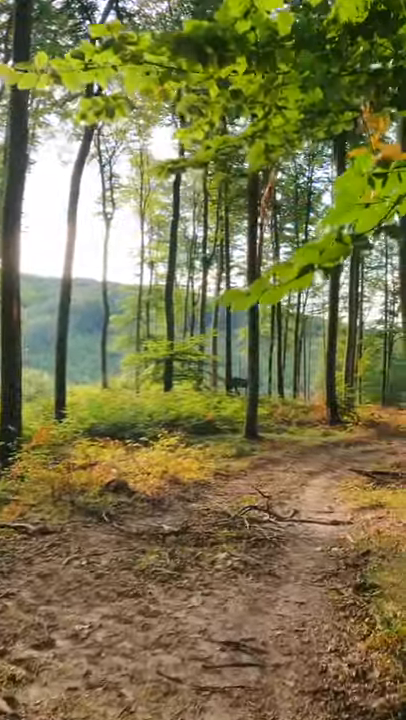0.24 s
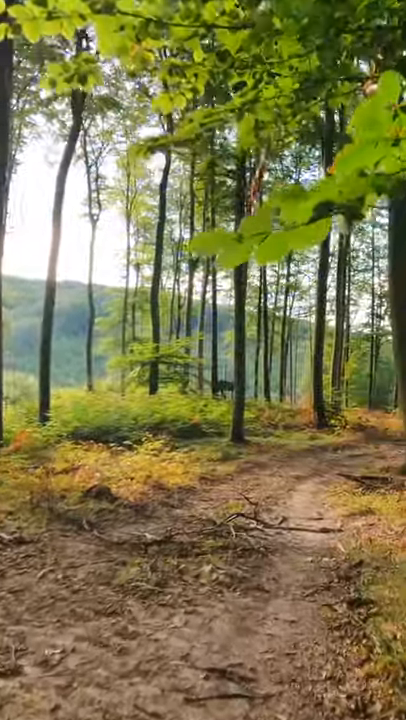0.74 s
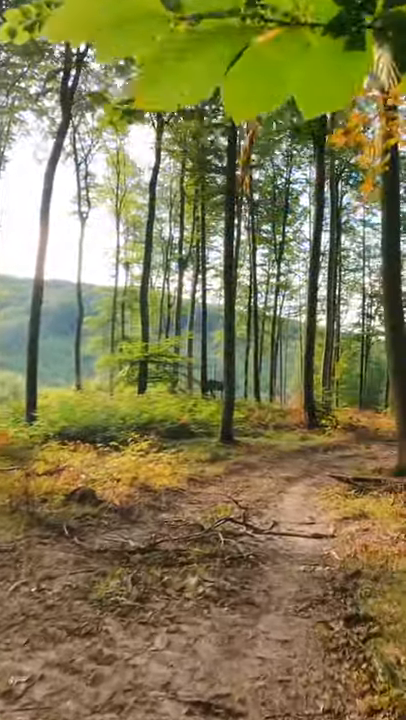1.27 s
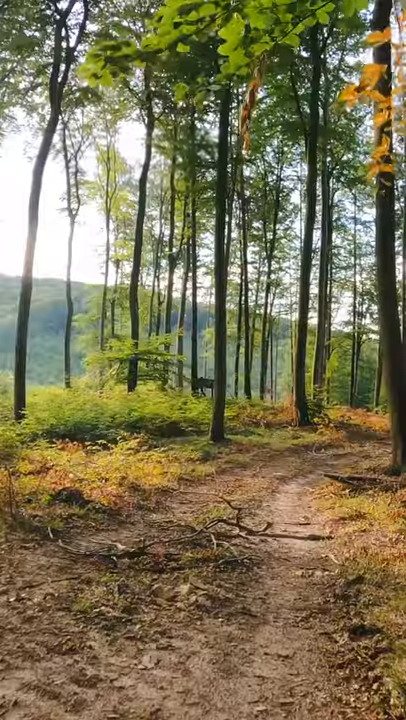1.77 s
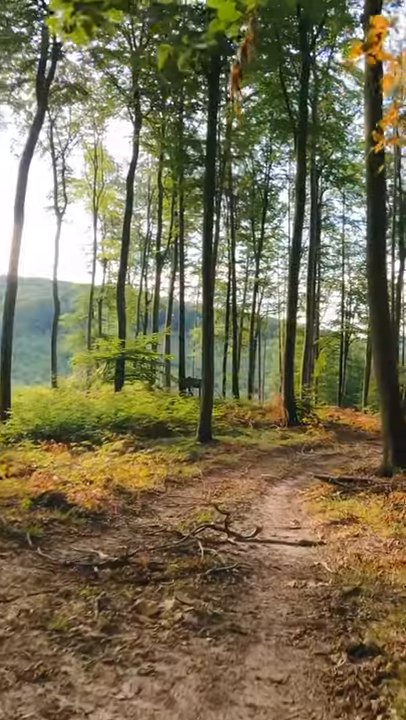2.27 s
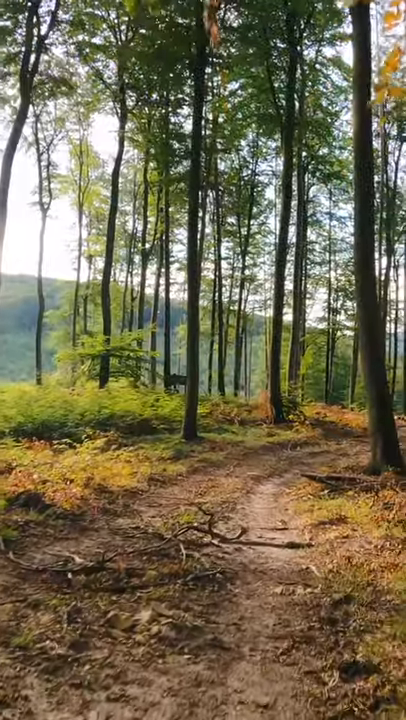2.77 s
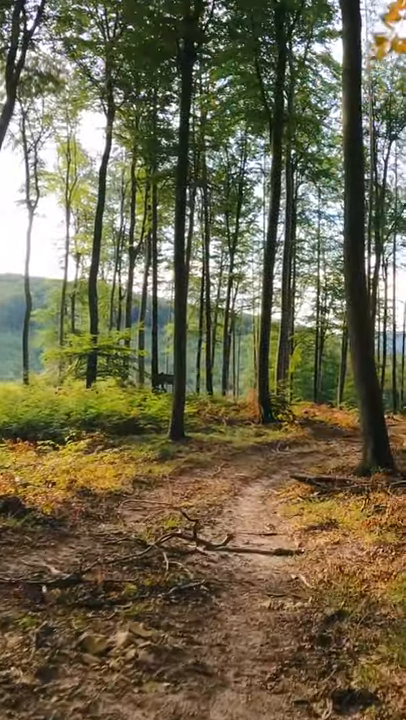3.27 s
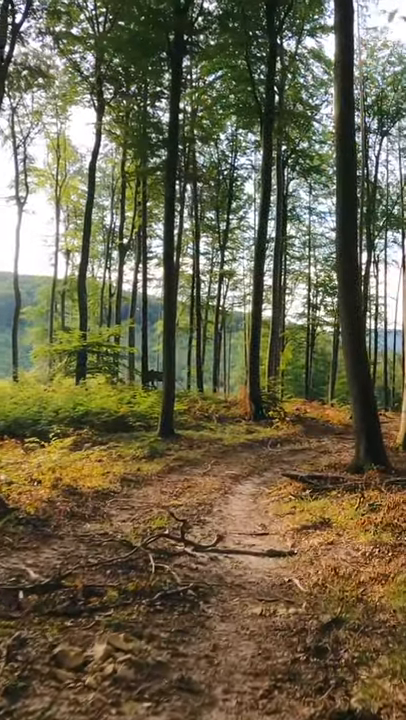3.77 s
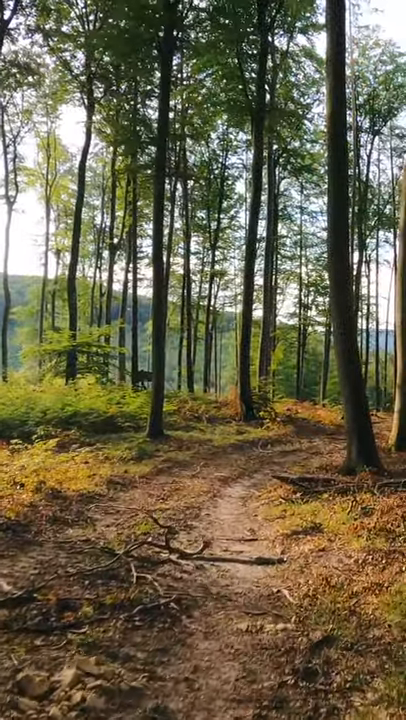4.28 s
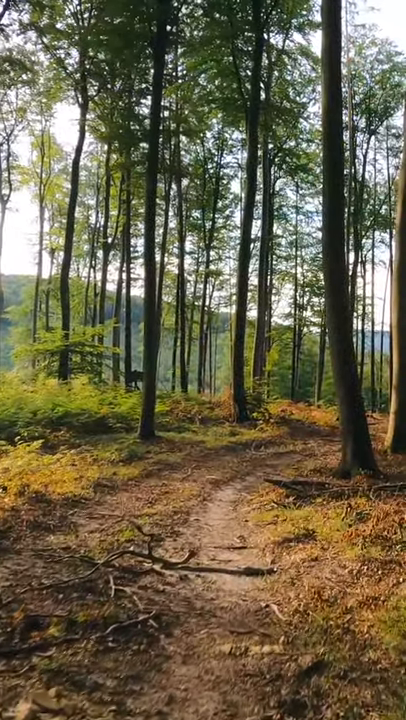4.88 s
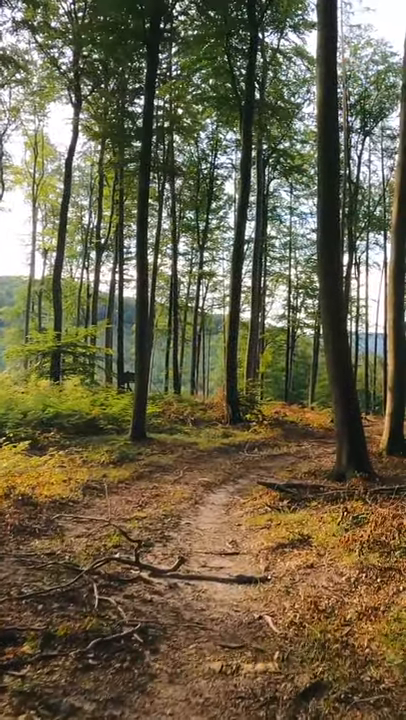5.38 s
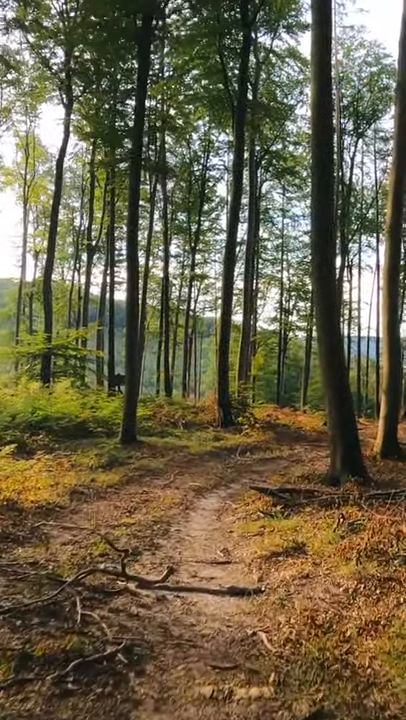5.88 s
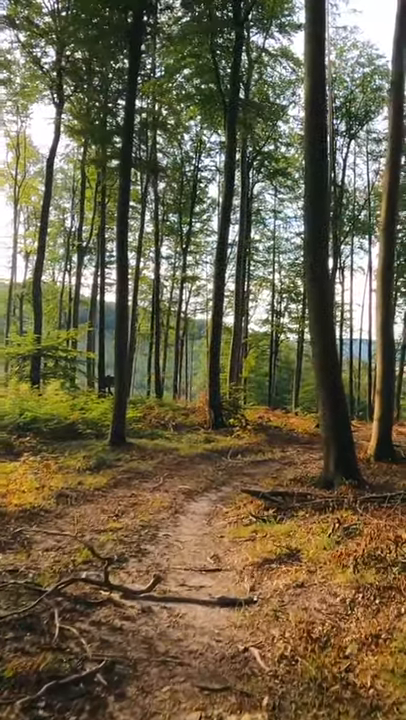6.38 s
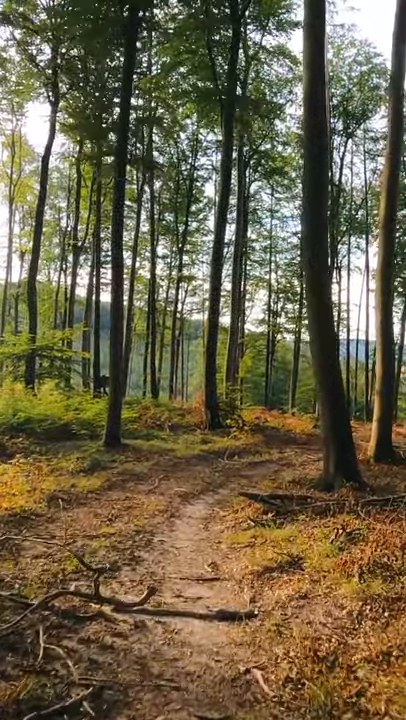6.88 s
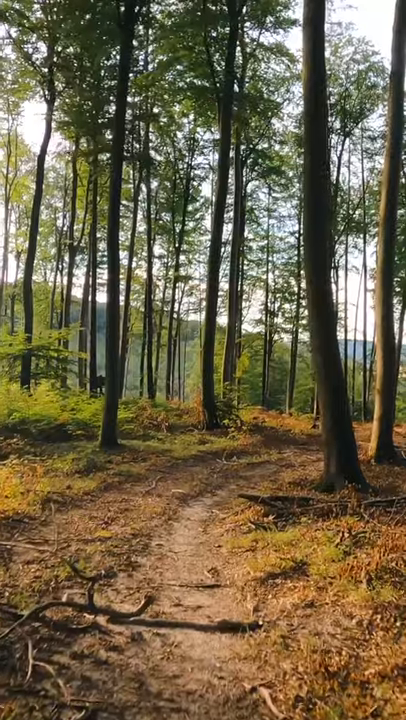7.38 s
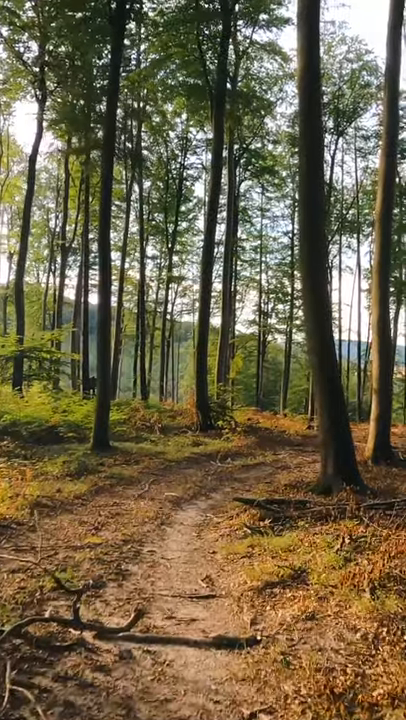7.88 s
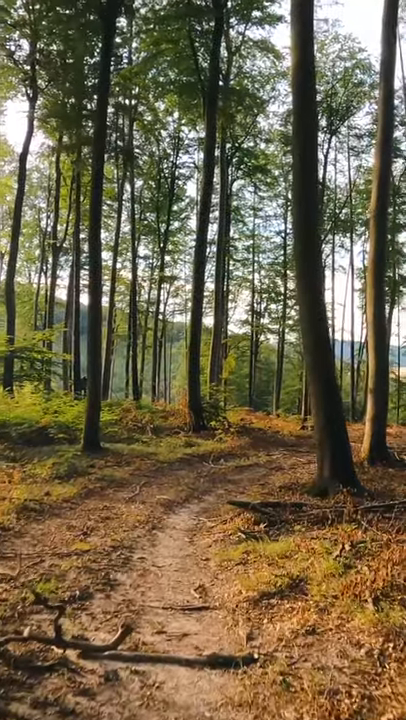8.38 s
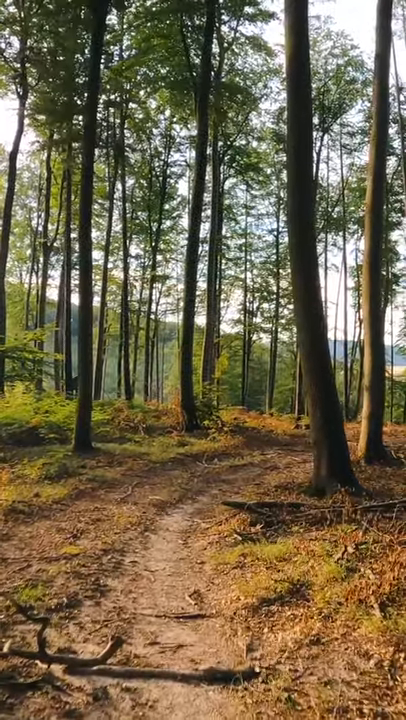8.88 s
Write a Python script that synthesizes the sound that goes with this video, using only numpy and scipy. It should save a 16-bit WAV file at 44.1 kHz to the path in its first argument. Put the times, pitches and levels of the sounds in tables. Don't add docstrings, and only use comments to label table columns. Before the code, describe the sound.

Bright birdsong rings among tall trees, with faint pigeon coos far off, snapping twigs, soft footfalls on leaf litter and a low wind rumble.

```python
import sys
import numpy as np
from scipy import signal
from scipy.fft import rfft, irfft
from scipy.io import wavfile
from scipy.ndimage import uniform_filter1d, map_coordinates

SR = 44100
rng = np.random.default_rng(int(sys.argv[2]) if len(sys.argv) > 2 else 0)


def ratio(d):
    e = np.asarray(d, float) / 20
    return 10 ** e


def persist_wave(psi):
    counts = np.round(np.clip(psi, -1, 1) * 32767).astype(np.int16)
    wavfile.write(sys.argv[1], SR, np.atleast_2d(counts).T)


N = 403074

# start_s, length_s, start_hz, end_hz, peak_db
LEFT_GLIDES = [(0.357, 0.03, 4150, 3210, -46), (0.669, 0.024, 3485, 3190, -49),
               (1.318, 0.11, 3855, 3980, -57.5), (4.0, 0.062, 3990, 4060, -56.5),
               (1.463, 0.091, 3545, 2950, -44.5), (3.367, 0.019, 3100, 2710, -45.5),
               (3.784, 0.03, 4080, 3990, -42.5), (4.745, 0.023, 2935, 2750, -43.5)]
AHEAD_GLIDES = [(2.486, 0.1, 2200, 1903, -48.5), (5.197, 0.0081, 3800, 5200, -55),
                (5.305, .018, 4500, 5050, -53.5), (2.875, 0.036, 2155, 1650, -61.5),
                (1.853, 0.043, 2470, 2940, -45.5), (2, 0.02, 2600, 2800, -49),
                (5.094, 0.029, 4300, 3930, -45), (5.125, 0.011, 3970, 4770, -50.5),
                (5.15, .008, 4300, 4900, -52), (5.162, 0.0073, 4700, 3300, -50),
                (3.3, 0.019, 6000, 7470, -61), (3.815, 0.063, 3960, 4050, -47),
                (4.371, 0.011, 3370, 2230, -47.5), (4.559, 0.023, 2220, 2680, -51.5),
                (4.818, 0.023, 8000, 5000, -57.5), (4.965, 0.013, 4050, 5380, -48),
                (5.205, 0.036, 5280, 4820, -50), (5.272, 0.036, 4410, 4570, -42.5),
                (6.021, 0.072, 6810, 7060, -61.5)]
RIGHT_GLIDES = [(1.262, 0.039, 1440, 1668, -49), (5.5, 0.1, 3024, 3090, -53.5),
                (1.676, 0.014, 1850, 1400, -47.5), (3.042, 0.013, 2700, 3000, -50.5),
                (.886, 0.011, 3100, 3500, -62), (5.375, 0.02, 5300, 5270, -58)]
# start_s, length_s, start_hz, end_hz, peak_db
LEFT_BOWS = [
    (0.265, 0.04, 4250, 3286, -47.5),
    (1.808, 0.031, 4000, 4250, -50),
    (3.615, 0.059, 7000, 6650, -58.5),
]
LEFT_ARCHES = [
    (1.65, 0.032, 2986, 2393, -41.5),
    (2.77, 0.03, 2650, 3220, -51.5),
]
AHEAD_BOWS = [(1.142, 0.1, 2530, 2860, -47.5), (1.7, 0.036, 2600, 2640, -45),
              (2.95, 0.068, 1684, 2270, -55.5), (3.96, 0.072, 3100, 3406, -49),
              (4.24, .1, 3050, 3610, -64.5), (4.32, 0.064, 2710, 3270, -53),
              (4.521, 0.019, 6140, 3690, -48.5)]
AHEAD_SAGS = [
    (2.354, 0.064, 2280, 2160, -50.5),
    (3.403, 0.028, 2824, 2630, -46.5),
    (4.908, 0.045, 5910, 5350, -44),
    (4.984, 0.021, 4900, 5680, -45),
    (5.017, 0.014, 5470, 3660, -43.5),
]
RIGHT_BOWS = [
    (8.522, 0.079, 1425, 1618, -52.5),
]
# time_s, pitch_hz, level_db
SUNG_LEFT = [
    [(0.0, 3250, -35.5), (0.016, 3223, -39), (0.03, 3142, -43.5), (0.045, 3330, -57.5)],
    [(1.836, 4170, -51), (1.856, 3170, -38.5), (1.864, 3201, -38), (1.884, 3272, -42), (1.912, 3164, -42),
     (1.93, 3270, -51)],
    [(4.575, 2600, -51), (4.595, 2740, -48.5), (4.621, 2660, -44.5), (4.637, 2774, -43),
     (4.703, 2730, -47.5), (4.71, 2720, -50)],
    [(4.962, 3265, -55), (4.97, 3270, -43), (4.99, 3124, -46), (4.998, 3060, -34.5), (5.004, 3290, -44.5),
     (5.022, 3110, -47.5)],
]
SUNG_AHEAD = [
    [(2.088, 2430, -56.5), (2.096, 2460, -41.5), (2.104, 2506, -35.5), (2.118, 2794, -35.5),
     (2.126, 2900, -34.5), (2.133, 2920, -44)],
    [(3.428, 2540, -62.5), (3.436, 2613, -44.5), (3.448, 2625, -43.5), (3.46, 2470, -41),
     (3.466, 2430, -48)],
]
SUNG_ARCHES = [
    [(.494, 2860, -59), (.504, 3154, -44), (.512, 3220, -41.5), (.526, 3320, -49), (.54, 3140, -46),
     (.55, 2930, -56.5)],
    [(.874, 2680, -60), (.884, 3194, -50.5), (.9, 3020, -51), (.934, 3186, -47.5), (.948, 2870, -49),
     (.96, 2380, -54)],
    [(3.052, 2190, -49.5), (3.06, 2630, -42), (3.07, 2907, -32), (3.08, 2654, -39), (3.088, 2190, -51)],
    [(3.105, 2140, -45), (3.115, 2542, -42.5), (3.127, 2924, -34), (3.137, 2634, -42.5), (3.146, 2100, -46)],
]
SUNG_HIGH = [
    [(3.264, 3950, -75), (3.27, 4005, -59), (3.304, 3860, -47.5), (3.342, 3620, -42), (3.35, 3600, -56)],
    [(3.895, 3535, -52), (3.907, 3790, -40), (3.922, 3847, -40.5), (3.935, 3650, -42.5), (3.946, 3350, -50)],
    [(4.8, 3660, -56.5), (4.82, 3794, -47.5), (4.842, 3548, -51.5), (4.85, 3700, -52.5), (4.88, 3680, -56)],
]
SUNG_LOW = [
    [(8.803, 2218, -58), (8.817, 1968, -52), (8.891, 1993, -40), (8.927, 2178, -41), (8.973, 2179, -34.5),
     (9.037, 2159, -40.5), (9.05, 2050, -60.5)],
    [(2.576, 1997, -60.5), (2.586, 2063, -35), (2.626, 1903, -46), (2.644, 1860, -38), (2.652, 1920, -47),
     (2.66, 2010, -49)],
    [(1.46, 1970, -41.5), (1.474, 1926, -39.5), (1.486, 1974, -44.5), (1.496, 1876, -38),
     (1.52, 1906, -32.5), (1.545, 1897, -55)],
    [(8.61, 2170, -58), (8.62, 2204, -49), (8.644, 2235, -48.5), (8.658, 2198, -41), (8.71, 2120, -56)],
]
SUNG_RIGHT = [
    [(0.96, 1630, -62), (0.97, 1830, -48.5), (0.98, 1857, -46.5), (1.02, 1739, -46), (1.094, 1688, -42.5),
     (1.14, 1667, -48.5), (1.16, 1720, -53.5)],
    [(1.872, 1603, -48), (1.908, 1616, -41), (1.934, 1706, -40), (1.998, 1594, -38.5), (2.036, 1648, -48),
     (2.05, 1585, -46.5), (2.058, 1604, -59.5)],
]
SUNG_DROPS = [
    [(1.6, 2310, -54), (1.606, 2360, -40.5), (1.614, 2363, -37.5), (1.624, 2150, -37.5), (1.635, 2105, -49)],
    [(1.643, 2425, -48), (1.655, 2390, -31), (1.665, 2180, -34.5), (1.675, 1880, -34.5), (1.68, 1880, -43)],
]
# start_s, length_s, start_hz, middle_hz, end_hz, level_db
HOARSE_NOTE = [
    (4.142, .07, 2520, 2600, 2700, -52),
    (4.158, .078, 2900, 2860, 2720, -46.5),
]
# time_in_note_s, pitch_hz, level_db
HIGH_NOTE = [(0, 3940, -22.5), (.012, 4200, -8), (.024, 4326, -6), (.03, 4203, -9), (.036, 3675, -9),
             (.047, 3300, -12), (.062, 3230, -14), (.095, 3235, -13), (.115, 3190, -25)]
LOW_NOTE = [(0, 3310, -6), (.01, 2850, -6.5), (.024, 2600, -4.5), (.04, 2780, -5), (.056, 2890, -1),
            (.07, 2830, -11.5)]
# start_s, level_db
HIGH_AT = [(5.262, -35.5), (5.586, -34), (5.925, -35), (6.266, -35), (6.648, -37.5)]
LOW_AT = [(5.121, -38.5), (5.454, -40), (5.78, -39.5), (6.125, -40), (6.484, -40.5)]
# start_s, length_s, centre_hz, swings_per_s, level_db
RATTLES = [
    (2.724, .012, 4600, 125, -60),
    (2.764, .033, 6050, 61, -47),
    (3.072, .016, 4200, 110, -56),
    (3.166, .011, 4300, 110, -59),
    (2.917, .034, 6300, 61, -50),
    (3.33, .085, 4300, 60, -51),
]
# time_in_group_s, start_hz, end_hz, level_db
STROKES = [(0, 4730, 5580, 2), (.004, 5600, 7100, -12.5), (.012, 5600, 4280, -6), (.017, 4800, 6800, -6.5),
           (.022, 5700, 4500, -3.5), (.027, 4790, 5680, -5), (.035, 5800, 4810, -8.5)]
# start_s, level_db
STROKES_AT = [
    (2.815, -37.5),
    (2.962, -37),
]
# first_s, spacing_s, level_db
TRILL = (1.287, .0232, -38.5)
# start_s, length_s, pitch_hz, level_db
VEILED = [(5.3, .07, 3450, -54.5), (1.472, .02, 4750, -56.5), (1.11, .03, 5400, -60.5),
          (8.16, .05, 4350, -62), (0.099, 0.04, 5075, -61), (8.035, 0.039, 3190, -51.5),
          (8.2, 0.12, 2952, -55.5), (6.902, 0.09, 3150, -55.5), (6.987, 0.011, 3230, -49),
          (7.34, 0.034, 3462, -46), (6.5, 0.03, 3447, -54.5), (7.535, 0.055, 4520, -48.5),
          (7.575, 0.061, 4220, -48), (7.55, 0.08, 3050, -51.5), (7.747, 0.094, 2773, -54),
          (8.08, 0.044, 3223, -45.5), (8.225, 0.021, 2950, -49.5), (8.288, 0.016, 2936, -53.5),
          (7.7, 0.11, 3447, -49.5), (8.598, 0.1, 3170, -46), (8.437, 0.064, 3240, -46)]
# start_s, length_s, start_hz, end_hz, level_db
FAR_FALLS = [(0, 0.029, 3755, 2960, -47), (1.094, 0.011, 5500, 3480, -56.5),
             (1.427, 0.031, 5620, 4350, -54.5), (8.92, .06, 2600, 2290, -51), (4.758, .02, 2860, 2290, -50),
             (1.785, 0.05, 4730, 3820, -52), (2.515, 0.035, 3030, 2600, -58),
             (2.681, 0.019, 2016, 1564, -54), (3.68, 0.012, 5370, 4880, -56.5),
             (3.77, 0.02, 5000, 3595, -49), (4.089, 0.0076, 7650, 5580, -51.5),
             (4.435, 0.041, 4680, 3870, -66), (5.74, 0.021, 7200, 4995, -61.5),
             (6.88, 0.05, 4490, 3680, -55.5), (7.1, 0.053, 4490, 3660, -57.5),
             (7.62, 0.075, 4900, 4470, -55.5), (7.5, 0.06, 6600, 4830, -69),
             (8.083, 0.026, 3874, 3190, -53.5), (8.272, 0.06, 3990, 3250, -52),
             (8.41, 0.035, 3770, 3170, -46.5), (8.61, 0.1, 2910, 2800, -53), (8.795, 0.08, 4240, 3200, -52),
             (8.86, 0.06, 3850, 3105, -51)]
FAR_RISES = [(5.366, 0.01, 3990, 5370, -50.5), (0.902, 0.042, 1394, 1524, -61),
             (1.973, 0.071, 1750, 1980, -51.5), (3.307, 0.046, 5600, 6900, -68.5),
             (3.7, 0.04, 2650, 3550, -52.5), (5.474, 0.016, 3720, 4436, -46.5),
             (6.147, 0.21, 7090, 7300, -69), (8.3, 0.049, 5880, 7200, -71),
             (7.02, 0.055, 7050, 6930, -63.5), (7.48, 0.078, 2960, 3627, -51)]
# start_s, length_s, start_hz, end_hz, level_db
CROWN_CALLS = [(1.33, .2, 9400, 9300, -79), (3.9, .08, 6200, 7800, -75), (4.36, 0.12, 5600, 6900, -78),
               (4.63, .035, 7600, 8000, -70), (4.672, 0.022, 8300, 7700, -78),
               (4.785, .025, 8100, 7200, -68), (4.2, .02, 7600, 6200, -70), (7.3, .08, 8000, 7800, -73),
               (7.9, .1, 7700, 7650, -78), (7.85, .05, 2400, 2400, -68), (3.875, 0.055, 2300, 2900, -66),
               (7.549, .009, 4750, 3850, -50), (7.11, .12, 4750, 4650, -67),
               (3.295, .012, 3600, 3200, -48.5), (4.445, 0.042, 3080, 3600, -59.5)]
# freq_hz, t60_s
WOOD_T60 = [(400, 0.33), (2000, 0.79), (4000, 0.95), (8000, 0.26)]
# start_s, length_s, start_hz, level_db
COOS = [(0.6, 0.39, 589, -71), (1.333, 0.28, 518, -67.5), (1.712, 0.25, 464, -61), (3.358, 0.27, 557, -67),
        (4.03, 0.29, 536, -75), (4.415, 0.16, 430, -67), (5.981, .32, 570.5, -66),
        (6.929, 0.12, 495, -63.5), (7.128, 0.2, 430, -61), (8.761, 0.24, 537, -66)]
# start_s, length_s, level_db
OPENERS = [(0.077, 0.18, -76.5), (2.7, 0.11, -72), (8.18, 0.18, -73), (2.33, .15, -75), (5.03, .12, -77)]
# start_s, peak_db, pitch_hz
TWIGS = [(1.473, -49, 635), (1.871, -42, 755), (1.909, -44.5, 1070), (1.967, -42, 1550), (2.01, -51, 1340),
         (2.085, -54.5, 1380), (3.019, -54, 1370), (3.119, -52, 730), (6.291, -54.5, 1290),
         (6.72, -53, 1120), (6.763, -46, 1100), (6.793, -41.5, 1450), (7.27, -53.5, 950), (7.663, -54, 670),
         (8.398, -52, 955)]
# start_s, peak_db
THUDS = [
    (0.382, -47.5),
    (1.491, -46),
    (3.03, -39.5),
    (3.116, -41.5),
    (3.769, -45.5),
    (7.851, -39),
]
# start_s, peak_db
LEAVES = [(0.3794, -60.5), (0.4174, -69.5), (1.0563, -66), (1.6341, -61), (1.8528, -58), (1.909, -66.5),
          (2.2788, -80.5), (3.127, -60), (3.5695, -75.5), (3.775, -59), (3.9826, -58.5), (4.315, -75.5),
          (5.9756, -59.5), (6.2298, -78), (6.3537, -73.5), (7.383, -68), (7.979, -71.5), (7.991, -65.5),
          (8.307, -68.5), (8.551, -74.5), (9.1142, -76.5)]
# centre_s, level_db
STEPS = [(.39, -60.5), (.93, -63), (1.49, -56), (2.02, -65), (2.57, -57.5), (3.04, -58.5), (3.612, -58.5),
         (4.15, -67), (4.62, -69), (5.24, -61.5), (5.43, -62.5), (5.75, -60.5), (6.0, -62), (6.3, -63),
         (6.78, -57.5), (7.28, -60), (7.85, -59), (8.399, -59), (8.83, -60.5)]
# time_s, rumble_db
WIND = [(0.0, -51.5), (0.1, -61), (0.41, -44.5), (0.46, -55), (1.78, -54), (1.86, -66), (2.39, -52.5),
        (2.49, -60.5), (3.08, -53.5), (3.16, -61.5), (3.31, -42), (3.41, -58.5), (6.75, -52), (7.84, -57),
        (7.89, -66), (8.35, -55), (8.83, -60.5), (9.14, -51.5)]
# freq_hz, density_db_per_hz
RUMBLE = [(8.8, -30.5), (15, -8), (65, 1.5), (156, -20.5), (300, -58), (390, -58.5), (660, -120)]
# freq_hz, density_db_per_hz
HUSH = [(70, -17), (130, -5.5), (320, -14), (820, -18.5), (1030, -12.5), (2500, -20), (3150, -10),
        (4300, -21.5), (5600, -27.5), (7400, -30), (8400, -37), (10900, -56.5), (16000, -81)]
# freq_hz, left_right_likeness
ALIKE = [(30, .62), (70, .86), (500, .8), (4000, .3)]


def songbirds():
    left, ahead, right = [whistle(notes, edge_s=0.0038, round_share=.27, quaver_db=0.67, flutter_hz=22.2)
                          for notes in near_notes()]
    left = left + whistle(HOARSE_NOTE, edge_s=.02, round_share=.3, quaver_db=4, flutter_hz=55)
    left = left + ratio(2) * refrain() + sung(SUNG_LEFT)
    ahead = ahead + sung(SUNG_AHEAD + SUNG_ARCHES + SUNG_HIGH + SUNG_LOW)
    right = right + rattles() + strokes() + sung(SUNG_RIGHT + SUNG_DROPS)
    direct = left * ratio([[2.3], [-2.3]]) + ahead * ratio([[.2], [-.2]]) + right * ratio([[-1.5], [1.5]])
    close = echoes(left + ahead + right, gap_s=0.011, early_db=4)

    level_notes = [(s, length_s, hz, hz, hz, db) for s, length_s, hz, db in VEILED]
    veiled = whistle(level_notes, edge_s=.015, round_share=0.1, quaver_db=4, flutter_hz=100)
    far_notes = straight(FAR_FALLS + FAR_RISES + CROWN_CALLS)
    far = whistle(far_notes, edge_s=0.0064, round_share=0.0088, quaver_db=3.8, flutter_hz=102)
    distant = echoes(far + veiled, gap_s=0.0069, early_db=-3.5)
    screen_db = -9
    return (ratio(4.5) * direct + ratio(-3.5) * close
            + ratio(screen_db) * veiled + ratio(-3) * far + ratio(1.26) * distant)


def near_notes():
    bow, arch, sag = .055, 0.15, -0.055
    return (straight(LEFT_GLIDES) + straight(LEFT_BOWS, bow) + straight(LEFT_ARCHES, arch),
            straight(AHEAD_GLIDES) + straight(AHEAD_BOWS, bow) + straight(AHEAD_SAGS, sag),
            straight(RIGHT_GLIDES) + straight(RIGHT_BOWS, bow) + trill())


def sung(notes):
    out = np.zeros(N)
    for note in notes:
        s, hz, db = np.transpose(note)
        t = np.arange(s[0], s[-1], 1 / SR)
        pitch_hz = uniform_filter1d(np.interp(t, s, hz), size=250, mode="nearest")
        soft_ends = np.minimum(1, 4 * np.hanning(len(t) + 2)[1:-1] ** .5)
        add(out, s[0], ratio(np.interp(t, s, db) - 0.17) * soft_ends * tone(pitch_hz))
    return out * ratio(1.5 * wobble(90))


def refrain():
    out = np.zeros(N)
    for shape, entries in ((HIGH_NOTE, HIGH_AT), (LOW_NOTE, LOW_AT)):
        s, hz, db = np.transpose(shape)
        t = np.arange(0, s[-1], 1 / SR)
        pitch_hz = uniform_filter1d(np.interp(t, s, hz), size=200, mode="nearest")
        soft_ends = signal.windows.tukey(len(t), .08)
        for start_s, level_db in entries:
            detune = 1 + 0.0049 * rng.normal()
            add(out, start_s, ratio(level_db + np.interp(t, s, db)) * soft_ends * tone(pitch_hz * detune))
    return out * ratio(3 * wobble(70))


def rattles():
    out = np.zeros(N)
    swing_share, still_hz = .27, 2700
    for s, length_s, centre_hz, rate_hz, db in RATTLES:
        t = np.arange(0, length_s, 1 / SR)
        swing = -np.cos(2 * np.pi * rate_hz * t)
        sinking = swing - 6 * t
        hz = centre_hz + swing_share * (centre_hz - still_hz) * sinking
        voice = tone(hz) + ratio(-34.5) * tone(2 * hz)
        add(out, s, ratio(db - 3.5 * swing) * signal.windows.tukey(len(t), .12) * voice)
    return out * ratio(3 * wobble(200))


def strokes():
    length_s = 0.0048
    notes = [(at_s + s, length_s, start_hz, end_hz, level_db + db)
             for at_s, level_db in STROKES_AT
             for s, start_hz, end_hz, db in STROKES]
    return whistle(straight(notes), edge_s=.002, round_share=.2, quaver_db=3, flutter_hz=200)


def trill(count=7):
    first_s, spacing_s, db = TRILL
    warmth = 1 - np.exp(-np.arange(count) / 0.7)
    return [(first_s + k * spacing_s, .021, 1520 + 260 * w, 1620 + 400 * w, 2050 + 900 * w, db)
            for k, w in enumerate(warmth)]


def straight(notes, bend=0):
    return [(s, length_s, start_hz, (start_hz + end_hz) / 2 * (1 + bend), end_hz, db)
            for s, length_s, start_hz, end_hz, db in notes]


def whistle(notes, edge_s, round_share, quaver_db, flutter_hz):
    out = np.zeros(N)
    flutter = flutter_hz * wobble(160)
    for s, length_s, start_hz, middle_hz, end_hz, db in notes:
        u = np.linspace(-1, 1, int((length_s + edge_s) * SR))
        mean_hz = (start_hz + end_hz) / 2
        hz = middle_hz + (end_hz - start_hz) / 2 * u + (mean_hz - middle_hz) * u ** 2
        hz += np.resize(flutter[int(s * SR):], len(u))
        ramp = (edge_s + min(round_share * length_s, .014)) / (length_s + edge_s)
        swell = np.sin(np.pi / 2 * np.clip((1 - abs(u)) / (2 * ramp), 0, 1)) ** 2
        add(out, s - edge_s / 2, ratio(db) * swell * tone(hz))
    return out * ratio(quaver_db * wobble(90))


def echoes(x, gap_s, early_db, piece_s=.4):
    out = np.zeros((2, N + 2 * SR))
    step = int(piece_s * SR)
    for i in range(0, N, step):
        noise = rng.standard_normal((2, SR)) + 1.1 * rng.standard_normal(SR)
        hz, t, z = signal.stft(noise, SR, nperseg=256)
        onset = np.clip((t - gap_s) / 0.0049, 0, 1)
        early = 1 + ratio(early_db - 60 * t / 0.24)
        decay = ratio(-60 * t / along(WOOD_T60, hz)[:, None])
        tail = signal.istft(z * onset * early * decay, SR, nperseg=256)[1]
        wet = signal.fftconvolve(x[None, i:i + step], tail / np.linalg.norm(tail[0]), axes=1)
        out[:, i:i + wet.shape[1]] += wet
    return out[:, :N] * ratio(2 * wobble(200))


def pigeon():
    rest_hz, open_from_hz, open_to_hz = 369, 430, 634
    calls = [(s, length_s, hz, rest_hz, db) for s, length_s, hz, db in COOS]
    calls += [(s, length_s, open_from_hz, open_to_hz, db) for s, length_s, db in OPENERS]
    coo = whistle(straight(calls, bend=.05), edge_s=.05, round_share=0.04, quaver_db=3.3, flutter_hz=20)
    return ratio(3) * coo + ratio(-1) * echoes(coo, gap_s=0.0076, early_db=2, piece_s=2)


def walker():
    out, crackle = np.zeros(N), np.zeros(N)
    t = np.arange(SR // 8) / SR
    for s, db, hz in TWIGS:
        ring = np.sin(2 * np.pi * hz * t) + .6 * np.sin(2 * np.pi * 1.6 * hz * t)
        add(out, s, ratio(db + 5 - 60 * t / 0.019) * ring)
    for s, db in THUDS:
        add(out, s, ratio(db - 60 * t / 0.024) * np.sin(2 * np.pi * 210 * t))
    for s, db in LEAVES:
        snap, settling = ratio(-60 * t / 0.018), ratio(-12.5 - 60 * t / 0.44)
        add(crackle, s, ratio(db + 5) * (snap + settling))
    time_s = np.arange(N) / SR
    scuffs = sum(ratio(db) * np.exp(-((time_s - s) / 0.039) ** 2) for s, db in STEPS)
    dry_leaf = rush([(2000, -31.0), (4500, 2.0), (7500, 0.0), (11500, -22.5), (13000, -41.5)])
    litter = rush([(120, -17.5), (300, -5.5), (1200, 0), (3000, -2), (9000, -31.5), (13000, -67)])
    grain = ratio(4.5 * wobble(120))
    return out + grain * (crackle * dry_leaf + scuffs * litter)


def air():
    s, db = np.transpose(WIND)
    lumps = unit(ratio(3.7 * wobble(5.5)) * rush(RUMBLE))
    gusts = ratio(2 + np.interp(np.arange(N) / SR, s, db))
    rumble = gusts * lumps * ratio([[1.1], [-1.1]])
    return rumble + ratio(-63) * patches(rush(HUSH), depth_db=1.8)


def patches(x, depth_db):
    z = signal.stft(x, nperseg=512)[2]
    field = uniform_filter1d(rng.standard_normal(z.shape[1:]), 9, axis=0)
    field = uniform_filter1d(field, 30, axis=1)
    return unit(signal.istft(z * ratio(depth_db * unit(field)), nperseg=512)[1][:, :N])


def rush(spectrum):
    hz = np.fft.rfftfreq(N, 1 / SR)
    turn = np.arccos(np.clip(along(ALIKE, hz), -1, 1)) / 2
    shaped = rfft(rng.standard_normal((2, N))) * ratio(along(spectrum, hz))
    mid, side = irfft(shaped * [np.cos(turn), np.sin(turn)], N)
    return unit(np.array([mid + side, mid - side]))


def tone(hz):
    return np.sin(2 * np.pi * np.cumsum(hz) / SR)


def wobble(rate_hz):
    knots = rng.standard_normal(int(N * rate_hz / SR) + 4)
    return map_coordinates(knots, [np.arange(N) * rate_hz / SR])


def along(points, hz):
    f, v = np.transpose(points)
    return np.interp(np.log(hz + 1), np.log(f + 1), v)


def unit(x):
    return x / np.sqrt(np.mean(x ** 2) + 1e-20)


def add(track, s, sound):
    place = track[max(round(s * SR), 0):][:len(sound)]
    place += sound[:len(place)]


def scene():
    left, right = songbirds() + pigeon() + walker() + air()
    lag_samples = 2
    return np.array([np.roll(left, lag_samples), right])


def low_pass(x):
    return signal.sosfilt(signal.butter(12, 12000, fs=SR, output="sos"), x)


def record(dry):
    return low_pass(dry)


dry = scene()
out = record(dry)
persist_wave(out)
```